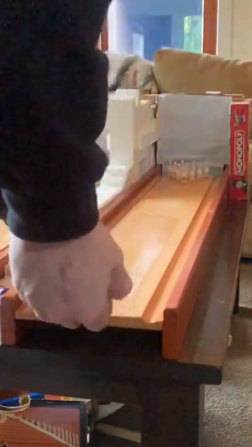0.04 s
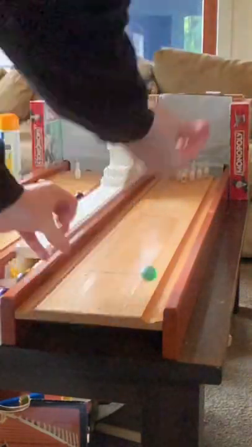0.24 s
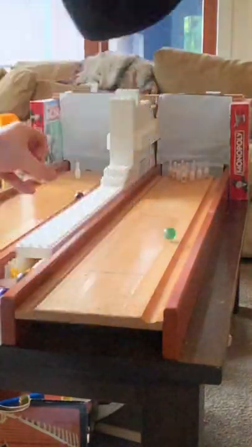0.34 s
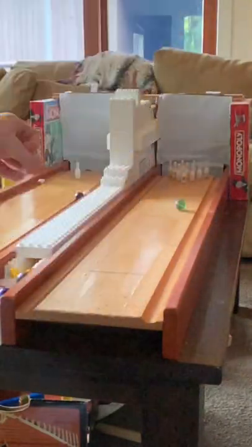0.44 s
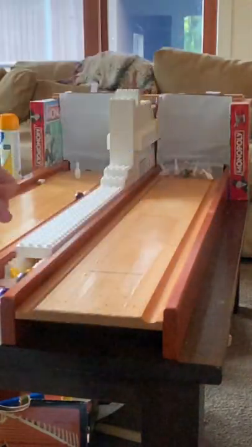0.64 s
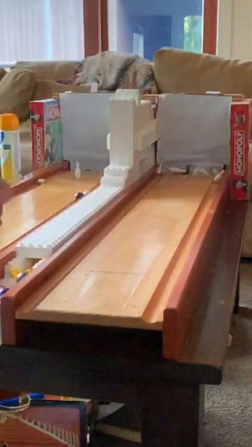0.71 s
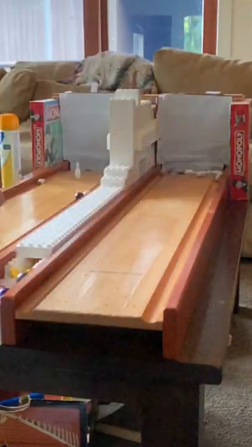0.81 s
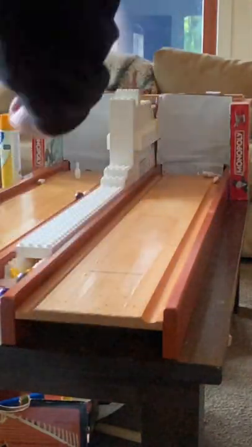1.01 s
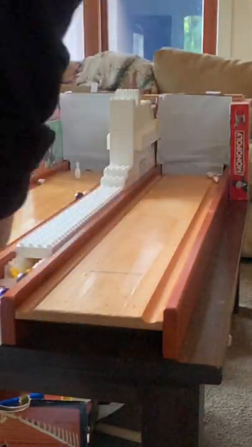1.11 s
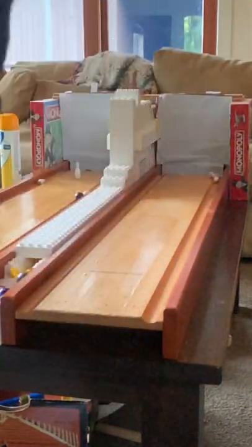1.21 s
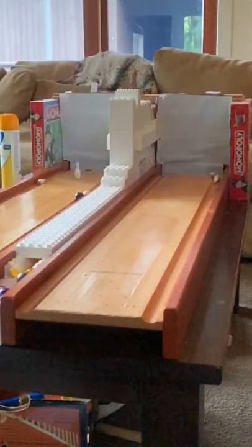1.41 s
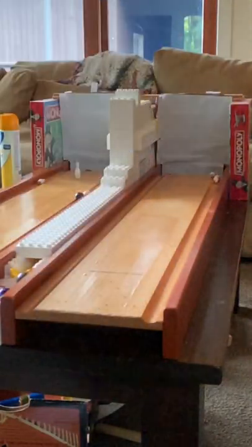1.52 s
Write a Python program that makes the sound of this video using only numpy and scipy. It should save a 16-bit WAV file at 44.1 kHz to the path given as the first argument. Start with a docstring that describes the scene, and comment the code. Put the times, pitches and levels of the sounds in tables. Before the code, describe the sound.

A small ball drops onto a wooden tabletop lane with a soft thud, bounces quickly and rolls into little pins, which clack together, topple and settle. It is heard from close by in a quiet, slightly reverberant room.

```python
"""Tabletop bowling in a living room

A small ball drops on a wooden lane, bounces ever lower and rolls into a set of little pins, which
clack together, topple onto the boards and settle. Each impact excites damped modes; the bumps of the
grain drive a rolling noise, and the table thuds and sways under the ball's weight.
The room reverberates around the game, heard by a pair of close microphones."""
import sys
import numpy as np
from scipy import signal
from scipy.fft import rfft, irfft
from scipy.io import wavfile

SR = 44100
rng = np.random.default_rng(int(sys.argv[2]) if len(sys.argv) > 2 else 0)


def unload_wav(signal):
    """Save mono or channel-first audio to the path in sys.argv[1] as 16-bit WAV at rate SR, clipped to [-1, 1]."""
    wavfile.write(
        sys.argv[1],
        SR,
        np.round(np.clip(np.atleast_2d(signal).T, -1, 1) * 32767).astype(np.int16),
    )


N = 68355

# Impact modes of ball and pins, from low to high: (frequency [Hz], relative level [dB], T60 [s])
BOOM_MODES = [(386, -3, 0.029), (553, -2.5, 0.038), (703.6, 1, 0.031)]
CLACK_MODES = [(1835, -3, 0.012), (2092, 0, 0.033), (2307, -1, 0.022), (2680, -1.5, 0.0069)]
TICK_MODES = [(2867, -5, 0.021), (3330, -6.5, 0.019), (3514, -1.5, 0.016), (3790, -1.5, 0.0088),
              (4600, -5, 0.006)]
SNAP_MODES = [(5250, 2, .007), (5750, 3.5, 0.0065), (6200, -2.5, 0.0072), (6720, -3, 0.019),
              (10500, 1.5, .008)]


def ball():
    """Impact excitation: each bounce rings the lane's modes, at a pitch that depends on the spot."""
    # (time [s], knock level [dB], knock pitch [Hz], boom level [dB], hollow level [dB], clack level [dB])
    bounces = [(0.2425, -22.5, 1428, -26.5, -21, -24), (.3458, -21.5, 1440, -21.5, -29.5, -26.5),
               (0.385, -27, 1367, -36, -34.5, -35), (0.428, -25.5, 1660, -34, -33.5, -31.5),
               (0.4684, -30, 1623, -34.5, -36.5, -35), (0.4935, -40, 1390, -35.5, -35, -44.5),
               (0.5085, -32, 1478, -45, -38, -38.5), (0.5386, -24.5, 1464, -36.5, -38.5, -35),
               (.574, -41.5, 1450, -39, -42.5, -40)]
    # Two opposed modes whose sum swells before it dies: (frequency [Hz], relative level [dB], T60 [s])
    hollow_modes = [(1041.4, 0, 0.035), (1034, 0.0037, 0.022)]
    knock_t60_s, knock_spread, side_db = 0.034, 0.081, -7
    out = np.zeros(N)
    for s, knock_db, knock_hz, boom_db, hollow_db, clack_db in bounces:
        knock = [(knock_hz * (1 - knock_spread), side_db, knock_t60_s),
                 (knock_hz, 0, knock_t60_s),
                 (knock_hz * (1 + knock_spread), side_db, knock_t60_s)]
        pitch = detuning()
        clack = [(hz * pitch, db, t60 * 0.74) for hz, db, t60 in CLACK_MODES]   # shorter than a pin's
        for modes, level_db, delay_s in (
                (knock, knock_db, 0.0002), (hollow_modes, hollow_db, 0.002),   # swell after the contact
                (BOOM_MODES, boom_db, 0), (clack, clack_db, 0),
                (TICK_MODES, clack_db - 22.5, 0), (SNAP_MODES, clack_db - 39, 0)):
            add(out, s + delay_s, impact(modes, level_db, scatter=0.97, scatter_s=0.0038))
    return light_contact(rounded_contact(out, edge_hz=13000))


def pins():
    """Free vibration: struck pins clack and sound the boards they hit; chatter prolongs the drive."""
    # (time [s], clack level [dB], boom level [dB], wood level [dB], spot pitch [Hz],
    #  tick level [dB], snap level [dB], chatter time constant [s])
    hits = [(0.201, -71, -62.5, -66.5, 1400, -70, -87.5, 0.002),
            (0.5893, -25.5, -31, -25.5, 1062, -33, -30.5, 0.0079),
            (0.6036, -27.5, -24.5, -23, 965, -32, -34, 0.0039),
            (0.6239, -36, -30, -29, 900, -57, -57, 0.002),
            (0.6296, -26, -22.5, -24, 1313, -55.5, -39, 0.0067),
            (0.6402, -21.5, -25, -26, 1450, -25.5, -30, 0.0039),
            (0.6499, -31.5, -34, -22.5, 1030, -37, -52, 0.0054),
            (0.6661, -26, -39.5, -36, 1006, -50, -50, .003),
            (0.6686, -29, -29.5, -21.5, 1008, -51.5, -47.5, 0.00082),
            (.682, -27.5, -30.5, -28.5, 1393, -41, -54, 0.0047),
            (.701, -34.5, -24.5, -39.5, 952, -39.5, -55.5, 0.0026),
            (0.738, -35.5, -38.5, -33.5, 1550, -46.5, -62, .005),
            (0.7565, -24, -25.5, -32, 1387, -36, -39.5, 0.0027),
            (0.7795, -21.5, -33, -26, 1525, -51.5, -62, 0.0032),
            (.812, -42.5, -41.5, -40.5, 1450, -53, -49.5, 0.0055),
            (.8505, -37, -41, -38, 1426, -45, -57.5, 0.0025),
            (0.8593, -35, -30, -30, 1473, -46, -62.5, 0.0059),
            (.886, -39.5, -33.5, -45, 858, -63, -69.5, 0.0038),
            (.9155, -46.5, -43.5, -40, 1620, -45.5, -68, 0.0026),
            (0.933, -31, -30, -31, 1119, -58, -83.5, 0.0032),
            (0.951, -52.5, -50.5, -38, 1256, -67, -73, 0.0022),
            (1.019, -49, -41.5, -37, 1710, -43, -50, 0.0063),
            (1.0275, -30, -35, -32.5, 1019, -43.5, -67, 0.013),
            (1.1809, -41, -51, -45.5, 1514, -45.5, -62, 0.0066),
            (1.220, -44.5, -54.5, -52, 1450, -55.5, -72, 0.03),
            (1.2802, -40, -41, -42, 1533, -52, -64, 0.0054),
            (1.324, -55, -73, -72, 1610, -66, -80.5, 0.0042),
            (1.351, -55, -71, -65, 1493, -72, -82.5, 0.007), (1.422, -68, -52, -67, 1466, -78, -94, 0.0043)]
    # Modes of the boards: (frequency [Hz], relative level [dB], T60 [s])
    wood_modes = [(843.6, -5, 0.071), (1050, -0.5, 0.02), (1196, -5.5, 0.061), (1398, 1, 0.023),
                  (1670, 0.5, 0.015)]
    spot_db, spot_t60_s = -1, 0.077   # the boards' own note where a pin lands
    out = np.zeros(N)
    for s, clack_db, boom_db, wood_db, spot_hz, tick_db, snap_db, chatter_s in hits:
        boards = wood_modes + [(spot_hz, spot_db, spot_t60_s)]
        pitch = detuning()
        for modes, level_db in ((CLACK_MODES, clack_db), (BOOM_MODES, boom_db), (boards, wood_db),
                                (TICK_MODES, tick_db), (SNAP_MODES, snap_db)):
            detuned = [(hz * pitch, db, t60) for hz, db, t60 in modes]
            add(out, s, impact(detuned, level_db, scatter=1.12, scatter_s=chatter_s))
    return rounded_contact(light_contact(out), edge_hz=3470)


def impact(modes, db, scatter, scatter_s):
    """Modal response to an impulse and its scatter, a burst of decaying noise."""
    t = np.arange(SR // 6) / SR
    drive = rng.standard_normal(len(t)) * np.exp(-t / scatter_s)
    drive *= scatter / np.linalg.norm(drive)
    drive[0] += 1
    sound = ring(drive, modes)
    window_s = 0.012   # the energy equals that of the given level held this long
    return from_db(db) * sound / np.linalg.norm(sound) * np.sqrt(window_s * SR)


def detuning():
    """Frequency scatter: a random ratio near one, as no two hits ring quite alike."""
    return 1 + 0.014 * rng.standard_normal()


def rounded_contact(x, edge_hz):
    """A force spread over time acts as a low-pass filter."""
    return signal.sosfilt(signal.butter(2, edge_hz, fs=SR, output="sos"), x)


def light_contact(x, edge_hz=248):
    """Light, hard contacts leave the lowest modes still: a high-pass filter."""
    return signal.sosfilt(signal.butter(3, edge_hz, "high", fs=SR, output="sos"), x)


def rolling():
    """Roughness excitation: tiny bumps of the wood grain drive a rumble and a gritty whirr."""
    # Envelope of the rolling ball and fallen pins: (time [s], level [dB])
    envelope = [(0.181, -84), (.222, -64.5), (.238, -27.5), (.32, -37), (.45, -30), (.57, -38.5),
                (.66, -33.5), (.73, -32), (.82, -39), (.98, -38), (1.081, -45.5), (1.2, -53), (1.33, -49.5),
                (1.42, -79), (1.55, -65.5)]
    # Low and high resonances of rolling: (frequency [Hz], relative level [dB], T60 [s])
    rumble_modes = [(120, -9.5, 0.1), (169, -8.5, 0.091), (250, 0, 0.2), (297.6, -5, 0.14),
                    (397.7, -7, 0.053), (580, -4, 0.06), (650, 3, 0.024)]
    grit_modes = [(890, 6, 0.021), (1040, 7, 0.012), (1297, 13, 0.012), (1761, 7, 0.015),
                  (2010, 5.5, 0.021), (2540, 4, 0.005), (3440, -16, 0.01), (5400, -32, 0.0018)]
    bumps_per_s, rumble_db, grit_db = 640, -9.5, -4.5
    bumps = (rng.random((2, N)) < bumps_per_s / SR) * rng.standard_normal((2, N))
    rumble = from_db(rumble_db) * rms_one(ring(bumps[0], rumble_modes))
    grit = from_db(grit_db) * rms_one(ring(bumps[1], grit_modes))
    return curve(envelope) * (rumble + grit)


def table_thuds():
    """A slow push excites only low modes: the ball's weight shakes the table and rocks it on its legs."""
    # (time [s], gain [dB], relative rocking level [dB])
    thuds = [(0.256, -36, -1.5), (0.355, -45.5, -1.5), (0.774, -40.5, -8.5), (1.245, -55, -1.5)]
    # Modes of the table: (frequency [Hz], relative level [dB], T60 [s])
    table_modes = [(85, 2, 0.22), (130, 3.5, 0.094), (197.4, 5, 0.1), (272, 1.5, 0.22), (273, 9.5, 0.19)]
    legs_hz, legs_t60_s = 49, 0.99
    out, impulse = np.zeros(N), signal.unit_impulse(N)
    for s, db, rocking_db in thuds:
        rocking = [(legs_hz, rocking_db, legs_t60_s)]
        body = [(hz, level + rng.normal(0, 1), t60) for hz, level, t60 in table_modes]
        add(out, s, from_db(db) * ring(impulse, rocking + body))
    return rounded_contact(out, edge_hz=210)


def table_sway():
    """Forced vibration: the rolling weight drives the table's lowest modes at random."""
    # Envelope of the sway: (time [s], level [dB])
    envelope = [(.24, -92), (.32, -53), (.53, -52.5), (.62, -62.5), (.76, -60.5), (.85, -47.5),
                (1.0, -55.5), (1.15, -63.5), (1.3, -70.5), (1.45, -75.5)]
    # Its modes: (frequency [Hz], relative level [dB], T60 [s])
    modes = [(48.5, -6, 0.33), (81, -8, 0.17)]
    return curve(envelope) * rms_one(ring(rng.standard_normal(N), modes))


def late_rumble():
    """Noise-driven resonance: a faint low rumble rises at the end."""
    # Envelope of the rumble: (time [s], level [dB])
    envelope = [(1.33, -78.5), (1.43, -58.5), (1.55, -59)]
    # Its modes: (frequency [Hz], relative level [dB], T60 [s])
    modes = [(135, -5, 0.06), (170, -1.5, 0.062), (213, -3.5, 0.063), (380, -2, 0.036)]
    return curve(envelope) * rms_one(ring(rng.standard_normal(N), modes))


def room(x):
    """Reverberation: dense reflections build up quickly and decay exponentially, band by band."""
    # Reverberation time: (frequency [Hz], T60 [s])
    decay_times = [(100, .5), (500, .5), (1500, 0.68), (3000, 0.36), (7000, 0.46)]
    # Colour of the reflections: (frequency [Hz], gain [dB])
    colour = [(100, -0.5), (300, 3), (480, 9.5), (650, -2.5), (850, -1), (1050, -14), (1500, -8),
              (2100, -5), (2900, 1.5), (3500, -1.5), (6000, 0)]
    build_s = 0.00074
    t = np.arange(SR) / SR
    white, tail = rng.standard_normal(SR), 0
    centres_hz = np.geomspace(100, 8000, 8)
    for hz, share in zip(centres_hz, np.eye(len(centres_hz))):
        band = shaped(white, lambda f: at_hz(list(zip(centres_hz, share)), f))
        tail = tail + band * np.exp(-np.log(1000) * t / at_hz(decay_times, hz))
    tail *= 1 - np.exp(-t / build_s)
    tail = coloured(tail / np.linalg.norm(tail), colour)
    return signal.fftconvolve(x, tail)[:N]


def diffuse_field(x):
    """Decorrelation: each microphone receives its own set of reflections."""
    # Colour of these reflections: (frequency [Hz], gain [dB])
    colour = [(100, -1.5), (260, -8.5), (600, -22), (900, -5.5), (1500, -4.5), (2200, -9), (3500, 2),
              (6000, -5.5)]
    return coloured(np.array([room(x), room(x)]), colour)


def microphones(x):
    """Level and phase differences make the stereo image; the sound reaches the left side first."""
    # (frequency [Hz], left minus right level [dB])
    balance = [(50, -7), (100, 6), (170, 11.5), (290, 6.5), (480, -1), (700, -1), (830, 4.5), (1040, 8.5),
               (1280, -1), (1600, 5), (2100, 0.5), (2750, -1), (3450, 10), (4000, 1), (6500, 0)]
    # (frequency [Hz], phase lag of the right side [rad])
    lag = [(40, 1.3), (150, 0.98), (260, 3.5), (450, 3), (620, 2.79), (800, 4.07), (1450, 5.29),
           (2100, 7.19), (2500, 6), (2850, 9.5), (3500, 13.66), (4700, 15.5), (6300, 18), (16000, 15)]
    left = shaped(x, lambda f: from_db(at_hz(balance, f) / 2))
    right = shaped(x, lambda f: from_db(-at_hz(balance, f) / 2)
                   * np.exp(-1j * np.interp(f, *np.transpose(lag))))
    return np.array([left, right])


def background():
    """Stationary noise: the low, even floor of a quiet room, weakly correlated between the sides."""
    # (frequency [Hz], relative spectral density [dB])
    spectrum = [(20, -20.5), (55, 7.5), (100, -13.5), (180, -12), (400, -23), (1000, -37), (4000, -41),
                (11000, -44.5), (15000, -46)]
    noise = coloured(rng.standard_normal((3, N)), spectrum)
    common, separate = noise[0], noise[1:]
    return from_db(-62.5) * rms_one(common + 3.2 * separate)


def ring(drive, modes):
    """Modal superposition: damped resonators in parallel, signs alternating."""
    out = 0
    for k, (hz, db, t60) in enumerate(modes):
        radius, angle = np.exp(-np.log(1000) / (t60 * SR)), 2 * np.pi * hz / SR
        feedback = [1, -2 * radius * np.cos(angle), radius * radius]
        mode = signal.lfilter([0, np.sin(angle)], feedback, drive + 1e-18)
        out = out + (-1) ** k * from_db(db) * mode
    return out


def from_db(db):
    """Decibels to amplitude gain."""
    return 10 ** (np.asarray(db) / 20)


def rms_one(x):
    """Normalisation to unit rms."""
    return x / np.sqrt(np.mean(x ** 2) + 1e-20)


def at_hz(points, hz):
    """Interpolation on a log-frequency axis."""
    f, values = np.transpose(points)
    return np.interp(np.log(np.maximum(hz, 1)), np.log(f), values)


def curve(points):
    """Interpolation in decibels gives a gain over time."""
    return from_db(np.interp(np.arange(N) / SR, *np.transpose(points)))


def shaped(x, response):
    """Filtering multiplies the spectrum by a frequency response."""
    size = 2 * x.shape[-1]
    hz = np.arange(size // 2 + 1) * SR / size
    return irfft(rfft(x, size) * response(hz), size)[..., :size // 2]


def coloured(x, points):
    """Zero-phase filtering by points of (frequency [Hz], gain [dB])."""
    return shaped(x, lambda f: from_db(at_hz(points, f)))


def add(track, s, sound):
    """Superposition of a sound on a track at time s."""
    start = int(s * SR)
    track[start:start + len(sound)] += sound[:N - start]


def scene():
    """Direct sound and reverberation add, with the treble shelved down, over the room's noise."""
    lane, clatter = ball() + rolling(), pins()
    game = lane + clatter
    reverberation = from_db(-5.5) * room(lane) + from_db(-6) * room(clatter)
    diffuse = diffuse_field(game)
    lows = table_thuds() + table_sway() + late_rumble()
    heard = microphones(game + reverberation + lows) + diffuse
    treble_edge_hz, leak_db = 6190, -25
    dulled = signal.sosfilt(signal.butter(12, treble_edge_hz, fs=SR, output="sos"), heard)
    return dulled + from_db(leak_db) * heard + background()


def record(dry):
    """Band limiting removes the deepest bass and the highest treble."""
    low_cut_hz, stopband_hz = 41, 14700
    dry = signal.sosfilt(signal.butter(5, low_cut_hz, "high", fs=SR, output="sos"), dry)
    return signal.sosfilt(signal.cheby2(12, 70, stopband_hz, fs=SR, output="sos"), dry)


dry = scene()
out = record(dry)
unload_wav(out)
```